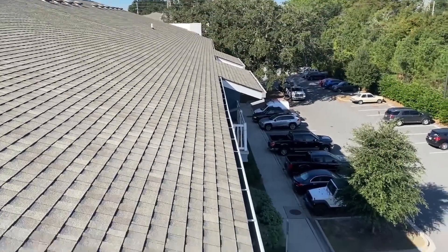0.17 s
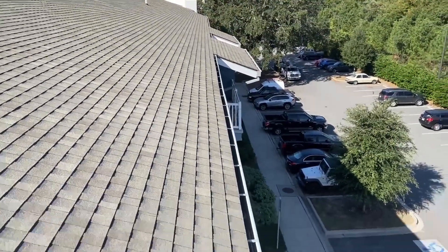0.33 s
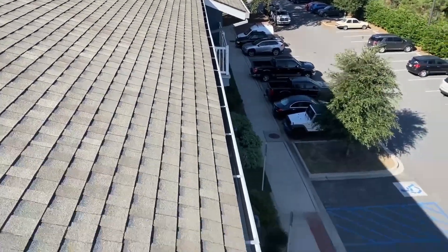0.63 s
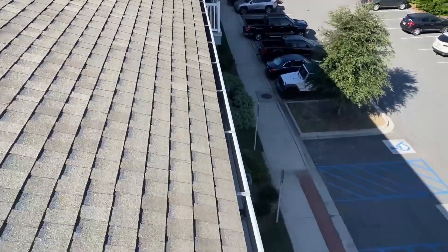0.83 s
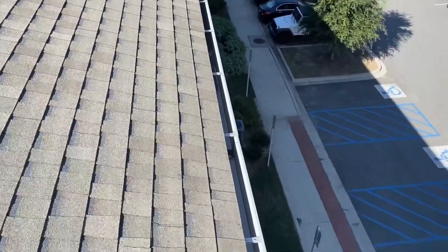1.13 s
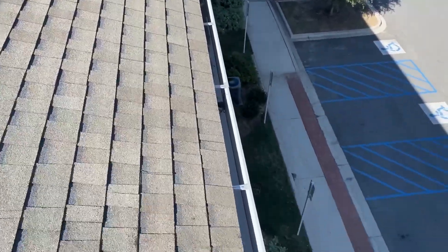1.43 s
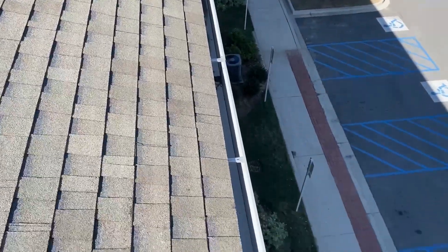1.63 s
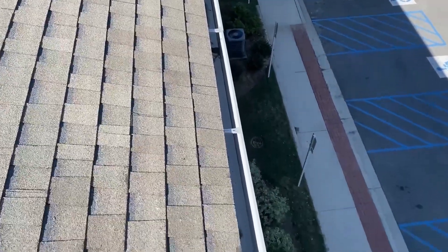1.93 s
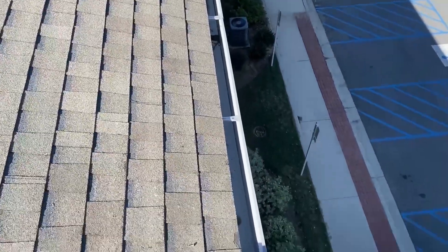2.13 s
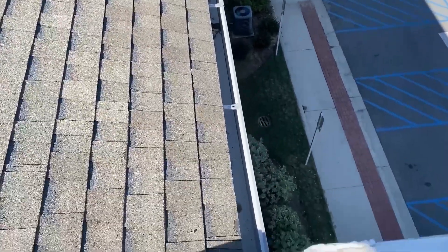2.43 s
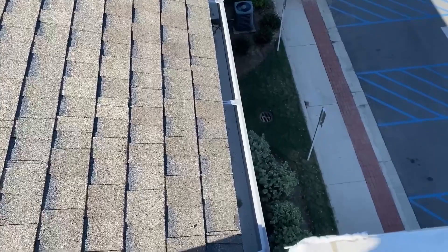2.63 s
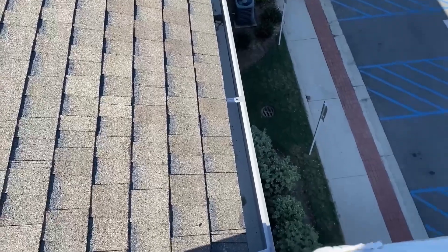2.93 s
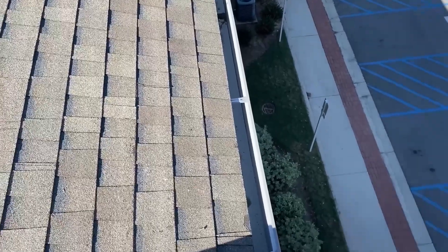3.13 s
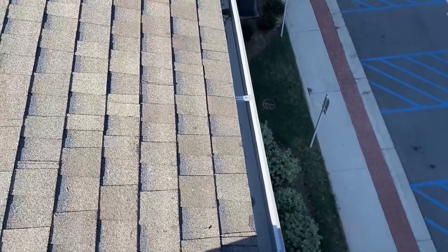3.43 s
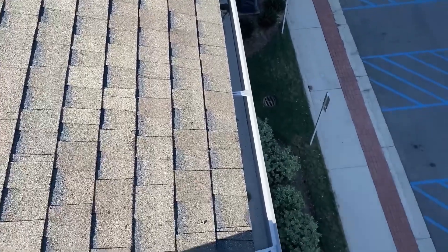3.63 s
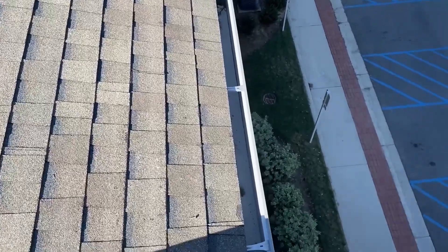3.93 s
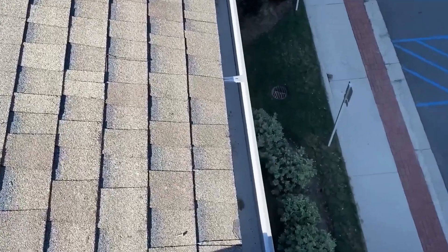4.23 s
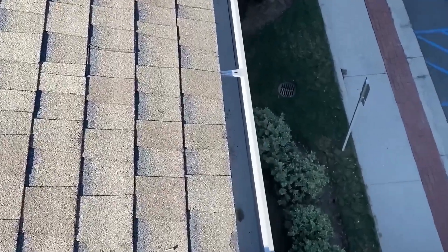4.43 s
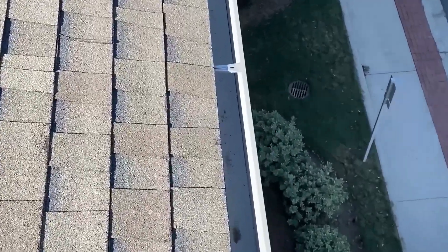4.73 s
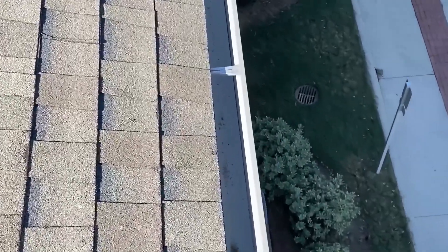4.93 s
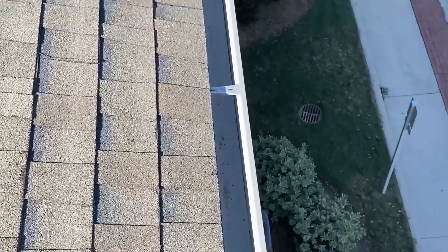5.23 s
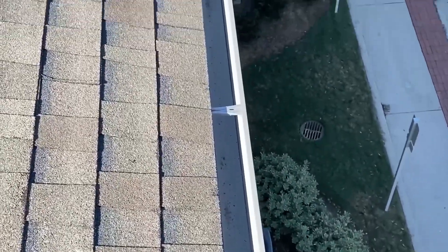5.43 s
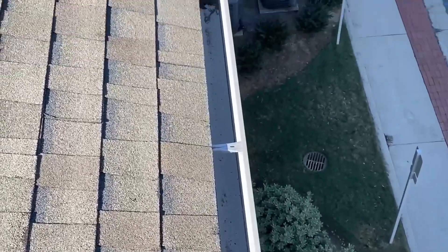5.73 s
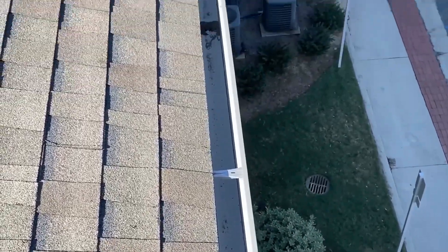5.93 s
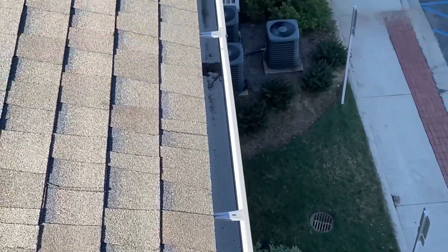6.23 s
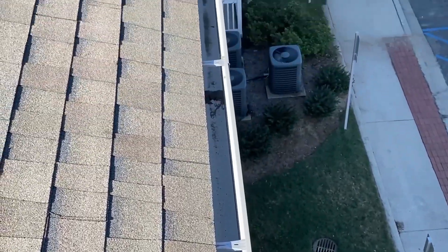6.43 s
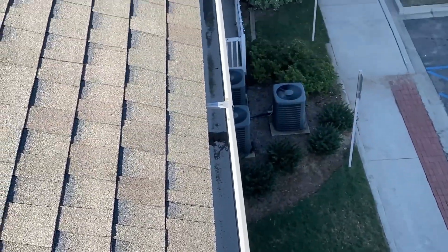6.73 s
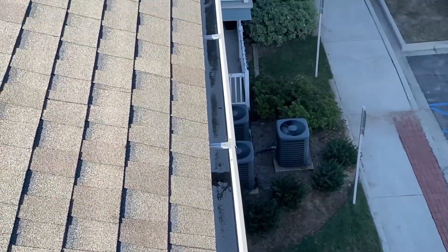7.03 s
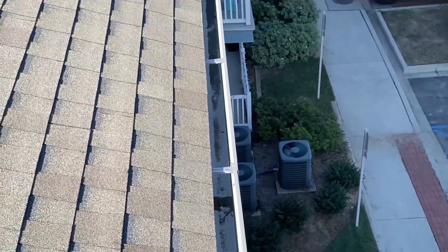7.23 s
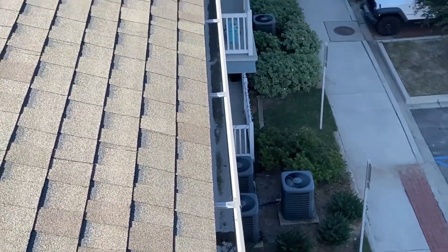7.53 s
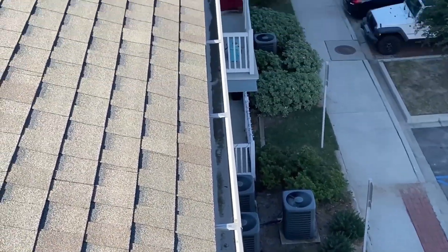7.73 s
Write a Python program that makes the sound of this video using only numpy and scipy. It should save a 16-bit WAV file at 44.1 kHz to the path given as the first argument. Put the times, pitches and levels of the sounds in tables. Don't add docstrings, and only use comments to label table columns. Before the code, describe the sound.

Outdoors beside a building, a low, steady fan hum from cooling units beats gently throughout, with quieter compressor tones, a shaft-like motor whirr towards the right and a faint high whine throbbing on and off. It grows nearer until about 2.5 s and eases slightly near the end. Wind makes soft, irregular low thumps on a handheld stereo microphone, heaviest from 2.3 to 2.9 s, then gentler. Close handling gives a scrape at 0.25 s, a clearer rub near 0.96 s, light taps around 1.5 s with a barely audible dry leaf rustle, and a cluster of knocks, scuffs and gritty clicks from 3.2 to 3.7 s. A few tiny ticks follow until 4.6 s. Far traffic hisses softly; one car's roar swells from 1 to 4 s, another around 7.5 s, as a thin, faint brake squeal rises.

```python
import sys
import numpy as np
from scipy import signal
from scipy.fft import rfft, irfft, next_fast_len
from scipy.io import wavfile
from scipy.ndimage import uniform_filter1d

SR = 44100
rng = np.random.default_rng(int(sys.argv[2]) if len(sys.argv) > 2 else 0)


def elevation(decibels):
    levels = np.asarray(decibels, float)
    return 10 ** (levels / 20)


def put_to_file(sound):
    columns = np.atleast_2d(sound).T
    safe = np.clip(columns, -1, 1)
    whole_steps = np.round(safe * 32767)
    wavfile.write(sys.argv[1], SR, whole_steps.astype(np.int16))


N = 347067
STEP = 10
T = np.arange(N // STEP + 1) * STEP / SR


def evened(x):
    return x / np.sqrt(np.mean(abs(x) ** 2) + 1e-20)


def smooth_noise(*widths):
    x = rng.standard_normal(N)
    for width in widths:
        x = uniform_filter1d(x, size=width)
    return evened(x)


def read(points, hz):
    f, value = np.transpose(points)
    return np.interp(np.log(hz + 1), np.log(f + 1), value)


def columns(rows, t):
    s, *values = np.transpose(rows)
    return np.array([np.interp(t, s, v) for v in values])


def drift(top_hz, t):
    f = np.geomspace(top_hz / 30, top_hz, num=16)[:, None]
    coarse = np.linspace(0, t[-1], num=1500)
    waves = np.sin(2 * np.pi * (f * coarse + rng.random(f.shape))) / np.sqrt(f)
    return np.interp(t, coarse, evened(waves.sum(0)))


def summed_turns(hz):
    return np.cumsum(hz) * STEP / SR


def grid(size):
    return np.fft.rfftfreq(size, 1 / SR)[:, None], np.arange(4 * N // size + 5) * size / 4 / SR


def noise(field_db, same, lead=0.):
    a, b, c, d = rng.standard_normal((field_db.shape[1], field_db.shape[0], 4)).T
    size, share = 2 * len(field_db) - 2.0, np.clip(same, 0, 1)
    mid = np.sqrt((1 + share) / 2) * (a + 1j * b)
    side = np.sqrt((1 - share) / 2) * (c + 1j * d)
    z = np.array([(mid + side) * np.exp(1j * lead), mid - side]) * elevation(field_db)
    scale = np.sqrt(3 * SR / 2 / size)
    return scale * signal.istft(z, nperseg=size, noverlap=3 * size // 4)[1][:, :N]


def band(hz, centres, rows_db):
    log_hz = np.log(hz[:, 0] + 1)
    weights = np.array([np.interp(log_hz, np.log(centres), one) for one in np.eye(len(centres))])
    return weights.T @ rows_db


# (start [s], length [s], level [dB])
WHINE_THROBS = [(.33, .42, -67), (0.998, 0.52, -72), (1.72, .52, -64), (2.42, .9, -75), (4., .7, -74.5),
                (5.4, .65, -78), (6.08, 0.32, -70)]


def whine_db():
    rest_db, edge_s = -82.5, 0.16
    start, length, db = np.transpose(WHINE_THROBS)[:, :, None]
    on = np.clip(np.minimum(T - start, start + length - T) / edge_s, 0, 1)
    return (rest_db + (db - rest_db) * on).max(0)


# (time [s], nearness [dB], compressor octave level [dB])
UNIT_NEARNESS = [
    (0.0, -7.5, -70),
    (.5, -5.5, -65),
    (1.3, -2.5, -61),
    (2.43, 0, -66.5),
    (2.67, -1.5, -62.5),
    (4.6, -1.5, -68),
    (6.3, -2.5, -72.5),
    (7.34, -3.5, -63.5),
    (7.87, -5, -71),
]
# (level when nearest [dB], share of the nearness followed [0-1])
UNIT_LEVELS = [
    (-38, .8),
    (-47.3, 1.1),
    (-52.5, .65),
]
# (pitch [Hz], level curve [index], level against it [dB], left-right [dB],
# left lead [radians], waver [dB])
UNIT_TONES = [(140.57, 0, 0.6, 0.35, 0.04, 1.3), (134, 0, -10, 0.6, .15, 1.2), (162, 0.5, -20, 0, .15, 1),
              (186.8, 0, -17, 0.5, -.2, 3.5), (282.8, -1, -25, 2.5, 0.18, 2), (217.2, 1, -3, 1.3, -.3, 1.5),
              (239.5, 1, -4.5, 2.2, -.2, 1.3), (354.7, 1, -16.5, -.3, -.8, 2.5),
              (478.5, 1, -22, 0.4, -.2, 2.5), (476, 1, -22, -1, -.2, 2.5), (724, 1.5, -24.5, 3., -.3, 1.5),
              (301, 2, 3, 2.5, -.53, 1.28), (601.6, 3, 2.5, 2, 0.33, 1.05), (1313, 4, 3.5, -1.5, -2.7, 1)]


def units():
    near_db, octave_db = columns(UNIT_NEARNESS, T)
    curves_db = [db + share * near_db for db, share in UNIT_LEVELS]
    curves_db += [octave_db, whine_db()]
    out = 0
    for hz, curve, db, pan_db, lead, waver_db in UNIT_TONES:
        turn = 2 * np.pi * (summed_turns(hz + .25 * drift(3., T)) + rng.random())
        gain = np.sqrt(2) * elevation(curves_db[round(curve)] + db + waver_db * drift(5., T))
        out = out + gain * elevation([[pan_db / 2], [-pan_db / 2]]) * np.cos(turn + np.array([[lead], [0]]))
    return out


# (multiple [count], level [dB])
SHAFT_ORDERS = [(12, -61), (17, -69), (20, -71), (21, -67.5), (24, -70.5), (27, -67.5), (30, -73),
                (31, -75.5), (32, -75.5), (33, -76.5), (34, -77.5), (36, -77.5), (38, -74), (39, -70),
                (40, -80), (41, -75.5), (42, -81.5), (45, -78), (50, -81), (53, -84.5), (54, -80.5)]


def motor():
    shaft_hz = 20.5
    turns = summed_turns(shaft_hz * (1 + 0.00064 * drift(2.2, T)))
    hum = 0
    for k, db in SHAFT_ORDERS:
        hum = hum + elevation(db + 2.6 * drift(2.2, T)) * np.cos(2 * np.pi * (k * turns + rng.random()))
    return elevation([[-5.], [1.5]]) * hum


# (peak time [s], level [dB], pitch [Hz])
WIND_PUSHES = [(0.06, -44.0, 86), (0.25, -44.0, 83), (0.419, -40.5, 94), (0.608, -35.0, 74),
               (0.853, -38.0, 92), (1.143, -42.5, 82), (1.337, -37.5, 82), (1.636, -34.5, 71),
               (1.751, -41.5, 76), (1.9, -32.5, 83), (2.121, -34.5, 71), (2.337, -26.5, 96),
               (2.511, -27.5, 77), (2.815, -28.5, 74), (2.991, -36.5, 88), (3.099, -34.0, 79),
               (3.229, -36.5, 83), (3.302, -33.0, 87), (3.381, -34.5, 83), (3.486, -37.0, 80),
               (3.648, -46.0, 74), (4.004, -41.5, 82), (4.103, -41.0, 81), (4.57, -41.0, 62),
               (4.833, -37.5, 82), (5.191, -34.5, 79), (5.26, -34.5, 70), (5.393, -39.0, 79),
               (5.596, -30.5, 72), (5.79, -39.0, 63), (6.01, -40.5, 74), (6.112, -33.0, 82),
               (6.22, -43.0, 89), (6.321, -38.5, 70), (6.581, -37.0, 72), (6.769, -33.0, 69),
               (6.968, -34.0, 70), (7.17, -37.0, 82), (7.316, -39.0, 84), (7.435, -34.0, 71),
               (7.755, -43.0, 75)]


def surges():
    length_s, sag, pitch_share, gain_db = .06, .9, .84, .4
    part = np.linspace(0, 1, num=round(length_s * SR))
    out = np.zeros(N + SR)
    for s, db, hz in WIND_PUSHES:
        turns = np.cumsum(pitch_share * hz * (1 + sag * (.5 - part))) / SR + rng.random()
        at = max(round((s - length_s / 2) * SR), 0)
        out[at:at + len(part)] += elevation(db + gain_db) * np.sin(2 * np.pi * turns) * np.sin(np.pi * part)
    return out[:N]


# (time [s], peak level [dB], pitch [Hz], upper part [dB])
WIND_BUFFETS = [(0.649, -26, 143.4, -23), (0.859, -28, 115, -20), (1.619, -26, 128, -19),
                (1.889, -30, 110, -22), (2.309, -17, 145, -12), (2.339, -17.5, 122, -20.5),
                (2.49, -19, 136, -16), (2.51, -24, 62.6, -27), (2.598, -22.5, 94.2, -27),
                (2.77, -23.5, 62, -27), (2.819, -25.5, 117, -20.5), (2.849, -20.5, 130, -22),
                (3.09, -23.5, 137, -22), (6.109, -27.5, 141, -25), (6.758, -25, 130, -20)]


def buffets():
    t = np.arange(round(0.033 * SR)) / SR
    out = np.zeros((2, N + SR))
    for s, db, hz, upper_db in WIND_BUFFETS:
        rough = 0
        for f, part_db in ((250., 0), (310., 2.5), (370., 0), (440., -5), (520., -12)):
            turns = f * t + rng.random((2, 1)) * 0.24 + rng.random()
            rough = rough + elevation(part_db) * np.cos(2 * np.pi * turns)
        swing = np.sin(2 * np.pi * (hz * t + rng.random()) + np.array([[-.35], [0]]))
        swing = swing + elevation(upper_db - 2.5) * rough
        at = max(round((s - .012) * SR), 0)
        gain = elevation(db - 4.5 + 0.33 * (db + 23.5))
        out[:, at:at + len(t)] += gain * swing * np.hanning(len(t)) * elevation([[.8], [-.8]])
    return out[:, :N]


def gust_db(t, rows, calm_db):
    s, db, fall_s = np.transpose(rows)[:, :, None]
    return np.maximum((db - 10 * abs(t - s) / fall_s).max(0), calm_db)


# (peak time [s], level [dB], time to fall 10 dB [s])
SHARED_GUSTS = [(0., -47, .18), (0.609, -41.5, .15), (.86, -41, 0.26), (1.36, -44.5, .15), (1.63, -40, 0.2),
                (1.9, -41.5, 0.1), (2.14, -38.5, 0.06), (2.33, -33, 0.14), (2.52, -32.5, 0.17),
                (2.68, -38, 0.3), (2.83, -33, 0.22), (3.29, -40, 0.4), (3.99, -45, .12), (4.15, -44, 0.4),
                (4.5, -44.5, .2), (4.83, -41.5, 0.5), (5.16, -38, 0.16), (5.26, -41.5, 0.4),
                (5.63, -37.5, 0.03), (5.8, -47, 0.7), (6.1, -38.5, .15), (6.33, -40.5, 0.16),
                (6.62, -39.5, .09), (6.77, -37.5, .14), (6.97, -38.5, .13), (7.17, -42, 0.4),
                (7.45, -40, 0.37)]
# (peak time [s],
# level [dB], time to fall 10 dB [s])
OPPOSED_EDDIES = [(0.15, -44, 0.08), (0.629, -46, 0.08), (0.782, -38, 0.08), (1.085, -43, 0.08),
                  (1.327, -46, 0.08), (1.605, -43, 0.08), (1.768, -43, 0.08), (1.936, -46, 0.08),
                  (2.172, -42, 0.08), (2.323, -37, 0.08), (2.499, -39, 0.08), (2.82, -42, 0.08),
                  (3.093, -45, 0.08), (3.298, -46, 0.08), (3.413, -49, 0.08), (3.532, -51, 0.08),
                  (3.822, -49, 0.08), (4.001, -46, 0.08), (4.147, -52, 0.08), (4.409, -51, 0.08),
                  (4.507, -52, 0.08), (4.705, -51, 0.08), (4.859, -53, 0.08), (5.125, -52, 0.08),
                  (5.593, -53, 0.08), (6.112, -51, 0.08), (6.596, -55, 0.08), (6.762, -54, 0.08),
                  (7.165, -56, 0.08), (7.424, -51, 0.08), (7.599, -56, 0.08),
                  (.87, -42, .2), (1.1, -45, .15), (.55, -48, .1), (2.65, -45, .1), (2.4, -45, .12)]
# (pitch [Hz], level [dB per Hz])
WIND_COLOUR = [(15, -60.5), (25, -41.5), (35, -15.5), (43, -4), (54, 0), (80, -2), (125, -3)]
# (time [s], narrowing [0-1])
NARROWING = [
    (0, 0),
    (1.3, 0.01),
    (2.5, .1),
    (3.8, .12),
    (4.3, 0.6),
    (5., 1),
    (7.87, 1),
]


def wind():
    hz, t = grid(size=2048)
    shared_db = gust_db(t, SHARED_GUSTS, -55.5)
    apart_calm_db = -53. - 9. * columns(NARROWING, t)[0]
    apart_db = gust_db(t, OPPOSED_EDDIES, apart_calm_db)
    shared_db = np.minimum(shared_db, -38.5 + 0.53 * (shared_db + 37.5))
    octaves = np.log2(np.maximum(hz, 125) / 125)
    under_pushes = np.clip(np.minimum(135. - hz, hz - 35.) / 30., 0, 1)
    shared = shared_db + read(WIND_COLOUR, hz) - 16.5 - 10.4 * octaves - 5. * octaves ** 2
    shared = shared - 3.6 * under_pushes
    apart = apart_db + read(WIND_COLOUR, hz * .62) - 19.0 - 3.2 * octaves - 4. * octaves ** 2
    apart = apart - 3.5 * np.clip((125. - hz) / 40., 0, 1)
    lumps = elevation(2.2 * smooth_noise(1200, 1200))
    return noise(shared, 1) * evened(lumps) + noise(apart, 1) * [[1], [-1]]


# (pitch [Hz], level [dB per Hz])
RUB_COLOUR = [(450, -29.5), (800, 4), (1100, 1.5), (1600, 0.5), (2400, 2.2), (3000, -2), (4200, -2),
              (6000, -1.5), (7200, .5), (9200, -1.5), (11000, 0), (13500, 1.5), (15500, -1.5),
              (16200, -30.5)]
# (pitch [Hz], left-right [dB])
LEFT_LEAN = [(1000, 3), (1600, 6), (2400, 3), (3200, 3.5), (4200, 1.5), (6000, 3), (7000, .5), (15000, 0)]
# (pitch [Hz], left lead [radians])
PORT_LEAD = [(1000, .3), (3000, 1.), (4200, .8), (5300, 1.4), (6300, -.6), (7000, 0), (9000, -3.1),
             (11000, -6.3), (13000, -9.2), (15500, -12.8)]


def to_ports(drive, centres_hz):
    size = next_fast_len(N)
    hz = np.fft.rfftfreq(size, 1 / SR)
    weights = band(hz[:, None], centres_hz, np.eye(len(drive))).T
    z = (weights * rfft(drive, size)).sum(0) * elevation(read(RUB_COLOUR, hz))
    left = z * elevation(read(LEFT_LEAN, hz) / 2)
    right = z * elevation(-read(LEFT_LEAN, hz) / 2) * np.exp(-1j * read(PORT_LEAD, hz))
    return irfft([left, right], size)[:, :N]


# (start [s], length [s], rub [dB], top part [dB])
CLOTH_DRAGS = [(0, .15, -82, -7), (0.718, .11, -84, -7), (0.99, 0.13, -85, -9), (2.477, .1, -74, -12),
               (2.56, .085, -78.5, -8), (3.209, .045, -76, 3.5), (3.228, .024, -67.5, 1.5),
               (3.383, .017, -58.5, -8), (3.424, 0.15, -81, -4)]
# (start [s], length [s], rub [dB], top part [dB])
SKIN_SLIDES = [(.566, .11, -84, -12), (.775, .025, -65.5, -11), (.92, 0.049, -78.5, -11),
               (.959, .04, -53.5, -7), (1.4, .13, -87, -12), (1.53, .17, -93, -2), (1.99, .14, -91, -20),
               (2.817, .087, -86.5, -9.5), (3.034, .13, -87, -5), (3.248, 0.04, -84, -6),
               (3.395, .04, -73.5, -7.5), (3.57, .18, -84.5, -8), (3.931, .07, -85.5, -20),
               (4.54, .07, -93, -5)]
# (start [s], length [s], rub [dB], top part [dB])
DULL_SCRAPES = [(.115, .035, -83.5, -9), (0.239, 0.077, -75, -4), (7.442, .044, -88, -30),
                (7.522, 0.042, -87.5, -30), (7.602, .057, -93, -32)]
# (low part [dB], edge softness [0-1], fade over the stroke [dB])
STROKE_KINDS = [
    (7.5, .4, .5),
    (3.5, .4, -5.5),
    (15, 0.4, -2.5),
]


def scuffs():
    power = np.zeros((3, N))
    for rows, (low_db, soft, fade_db) in zip((CLOTH_DRAGS, SKIN_SLIDES, DULL_SCRAPES), STROKE_KINDS):
        for s, length, db, top_db in rows:
            stroke = signal.windows.tukey(round(length * SR), soft)
            stroke = stroke * elevation(fade_db * np.linspace(-.5, .5, num=len(stroke)))
            at = max(round(s * SR), 0)
            parts = elevation([[db + low_db + 8.], [db + 8.], [db + top_db + 10.0]])
            power[:, at:at + len(stroke)] += (parts * stroke) ** 2
    grain = elevation(1.8 * smooth_noise(90) + 1.5 * smooth_noise(500))
    return to_ports(np.sqrt(power) * evened(grain * rng.standard_normal(N)), [4100, 5100, 10000])


# (time [s], blow [dB], top part [dB])
CASE_KNOCKS = [
    (3.388, -29.5, -8),
    (3.4085, -35.5, -3),
    (3.4843, -21, -11),
    (3.5001, -25.5, -21),
]
# (time [s], blow [dB], top part [dB])
GRIP_TAPS = [(1.0753, -62, 7), (1.457, -56, -14), (1.4941, -42.5, -4), (1.5674, -56.5, 8),
             (1.6312, -54, 10), (2.962, -53, -25), (3.234, -40, 7), (3.3771, -39, -10), (3.442, -42.5, -25),
             (3.455, -45.5, 2), (3.5499, -43.5, -7), (3.7369, -72, 20)]
# (time [s], blow [dB], top part [dB])
GRIT_TICKS = [(1.046, -44.5, -24), (1.0612, -56, 11), (1.7979, -57, -3), (2.8296, -48, -21),
              (3.054, -57, -27), (3.4896, -39, -25), (3.5106, -39.5, -1), (3.5184, -44.5, 0),
              (3.523, -40.5, -8), (3.5402, -48.5, -16.5), (3.5545, -47.5, -4), (3.5755, -41.5, -.5),
              (3.6331, -45.5, 3), (3.6478, -48, -1), (3.6546, -41.5, -5.5), (3.7165, -57.5, 8),
              (3.8094, -52, -24), (3.942, -51, -12), (4.448, -54, -8), (4.5843, -56, -10)]
# (knock part [dB], low part [dB])
BLOW_KINDS = [
    (14.5, 2.5),
    (-15., 9),
    (-15., -15.),
]


def ticks():
    drive = np.zeros((4, N))
    for rows, kind_db in zip((CASE_KNOCKS, GRIP_TAPS, GRIT_TICKS), BLOW_KINDS):
        knock, low = elevation(kind_db)
        for s, db, top_db in rows:
            at = round(s * SR)
            parts = [.5 * knock, low, 1, elevation(top_db)]
            drive[:, [at, at + 60]] += elevation(db) * np.outer(parts, [1, -.25]) * rng.choice([-1, 1])
    return to_ports(drive, [1300, 2600, 6000, 11000])


# (start [s], length [s], pitch [Hz], level
# [dB])
HAND_RINGS = [(.245, .065, 3200, -68), (.245, .065, 2400, -69), (.778, .02, 5200, -71),
              (.962, .036, 1090, -51), (.962, .034, 2400, -57), (.962, .034, 3200, -56),
              (2.485, .09, 3200, -72), (2.61, .03, 6400, -78), (3.212, .04, 7600, -71),
              (3.222, .03, 4200, -70), (3.383, .018, 5300, -57.5), (3.383, .018, 1600, -56),
              (7.452, .03, 4000, -77), (7.525, .035, 3900, -78), (7.452, .03, 2100, -72),
              (3.384, .016, 850, -58), (3.482, .008, 1500, -55)]


def rings():
    half_width = .07
    out = np.zeros((2, N))
    for s, length, hz, db in HAND_RINGS:
        edges = [hz * (1 - half_width), hz * (1 + half_width)]
        hollow = signal.butter(2, edges, "band", fs=SR, output="sos")
        ring = evened(signal.sosfilt(hollow, rng.standard_normal(SR // 8)))[-round(length * SR):]
        ring = elevation(db) * ring * signal.windows.tukey(len(ring), .6)
        for port, late, lean_db in ((0, 0, 0), (1, rng.integers(0, 6), -3.5)):
            at = round(s * SR) + late
            out[port, at:at + len(ring)] += elevation(lean_db) * ring
    return out


def patchy(hz, t):
    x = rng.standard_normal((len(hz), len(t)))
    return evened(uniform_filter1d(uniform_filter1d(x, size=10, axis=0), size=12, axis=1))


def ridge(rows, width_hz, hz, t):
    centre_hz, db = columns(rows, t)
    silent = (t < rows[0][0]) | (t > rows[-1][0])
    return db - 10 * np.log10(2.2 * width_hz) - 3.7 * ((hz - centre_hz) / width_hz) ** 2 - 200 * silent


# (time [s], pitch [Hz], level [dB])
CAR_ROAR = [(.4, 1190, -74), (1., 1270, -69), (1.5, 1334, -63.5), (2.1, 1335, -66), (2.5, 1335, -68.5),
            (3., 1360, -62.5), (3.7, 1406, -62), (4.3, 1400, -80)]
# (time [s], pitch [Hz], level [dB])
CAR_TREAD = [
    (.5, 2240, -78),
    (.9, 2310, -70),
    (1.5, 2350, -71.5),
    (2.2, 2380, -80.5),
    (2.6, 2400, -83.5),
]
# (time [s], pitch [Hz], level [dB])
SECOND_CAR = [
    (7.2, 1290, -77),
    (7.45, 1404, -63),
    (7.6, 1400, -62),
    (7.87, 1350, -71),
]
# (time [s], pitch [Hz], level [dB])
LEAF_RUSTLE = [
    (1.25, 7000, -103),
    (1.42, 7200, -90),
    (1.55, 7100, -96),
    (1.75, 7000, -103),
]


def cars_and_leaves():
    hz, t = grid(size=1024)
    bands = [ridge(CAR_ROAR, 65., hz, t), ridge(CAR_TREAD, 180., hz, t),
             ridge(SECOND_CAR, 250., hz, t), ridge(LEAF_RUSTLE, 450., hz, t)]
    return noise(np.max(bands, axis=0) + 1.9 * patchy(hz, t), .7)


# (time [s], pitch [Hz], level [dB])
BRAKE_SQUEAL = [(6.4, 2590, -95), (6.7, 2630, -87), (7.1, 2650, -88), (7.4, 2720, -85), (7.48, 2740, -75),
                (7.62, 2745, -72.5), (7.78, 2750, -76), (7.87, 2760, -88)]


def squeal():
    t = np.arange(round(BRAKE_SQUEAL[0][0] * SR), N) / SR
    hz, db = columns(BRAKE_SQUEAL, t)
    gain = np.sqrt(2) * elevation(db + 2.5 * drift(18.0, t - t[0]))
    tone = gain * np.sin(2 * np.pi * np.cumsum(hz) / SR)
    return np.pad(tone, (N - len(t), 0))


# (pitch [Hz], level [dB per Hz])
AIR_COLOUR = [(35, -105), (60, -77.5), (110, -72), (200, -71), (260, -74.5), (400, -81), (630, -83.5),
              (1000, -89.5), (1700, -99), (2400, -103), (3550, -110), (4200, -117.5), (5500, -124),
              (6400, -131), (9000, -139), (16000, -146)]
# (pitch [Hz], likeness [0-1])
AIR_LIKENESS = [(60, 1), (250, .9), (640, 0.69), (1100, .55), (1500, .4), (2400, .8), (6000, 0.74),
                (15000, .9)]
# (time [s], swell [dB], extra hiss while the road is in the open [dB])
FAR_TRAFFIC = [(0.0, .5, 1.5), (.33, -2.5, 2), (.6, 1.5, -.5), (.94, 2, 2.5), (1.36, 3, .5),
               (1.88, 1, -2.5), (2.35, 1.5, 0.5), (2.94, 3.5, .5), (3.4, 7, -0.5), (3.9, 5.5, -5),
               (4.62, -1, -3), (5.19, 1.5, -4.5), (6.4, 0.9, -1.5), (6.8, 1, -1.5), (7.15, 4.5, -3.5),
               (7.52, 8.5, 2.5), (7.87, 4.5, -0.2)]


def wash():
    hz, t = grid(size=1024)
    swell_db, open_db = columns(FAR_TRAFFIC, t)
    narrowing = columns(NARROWING, t)[0]
    body_db, roar_db, hiss_db = 1.1 + .5 * swell_db, swell_db, .9 * swell_db + open_db
    swells = band(hz, [250, 600, 1400, 3200, 8000], [0 * t, body_db, roar_db, hiss_db, 0 * t])
    field = read(AIR_COLOUR, hz) + swells + 1.2 * patchy(hz, t) + .5 * drift(4.3, t)
    unlike = np.where(hz > 2100, elevation(10.5 - 37. * narrowing), 1)
    same = 1 - (1 - read(AIR_LIKENESS, hz)) * unlike
    treble_lead = read(PORT_LEAD, hz) * (hz > 7000)
    bass_lead = -0.44 * (hz < 1500) * hz / 1000
    return noise(field, same, treble_lead + bass_lead)


def scene():
    tones = signal.resample_poly(units() + motor(), STEP, 1, axis=1)[:, :N]
    moving_air = surges() + buffets() + wind()
    handling = scuffs() + ticks() + rings()
    return tones + moving_air + handling + cars_and_leaves() + squeal() + wash()


def roll_off(x):
    return signal.sosfilt(signal.butter(12, 16450, fs=SR, output="sos"), x)


def record(dry):
    clock_hz, clock_db = 12000., -64.5
    heard = signal.sosfilt(signal.butter(4, 41., "high", fs=SR, output="sos"), dry)
    clock = elevation(clock_db) * np.cos(2 * np.pi * clock_hz * np.arange(N) / SR)
    mix = heard + heard.mean(0) * clock
    return roll_off(mix)


dry = scene()
out = record(dry)
put_to_file(out)
```